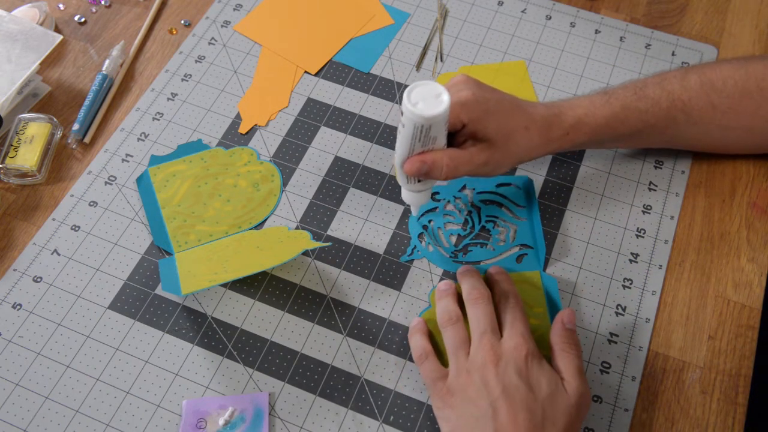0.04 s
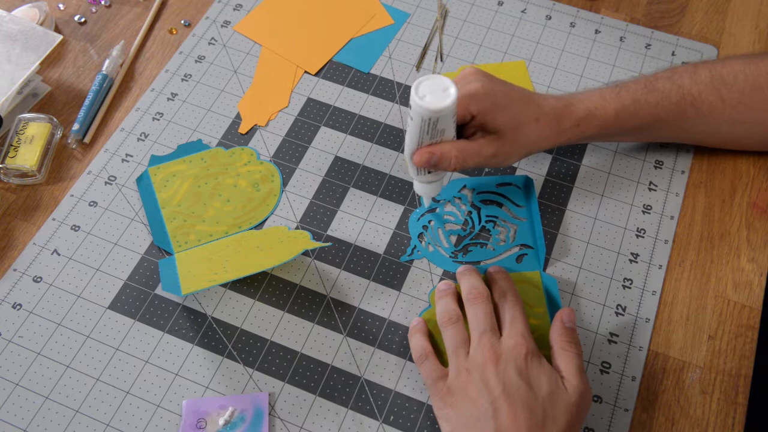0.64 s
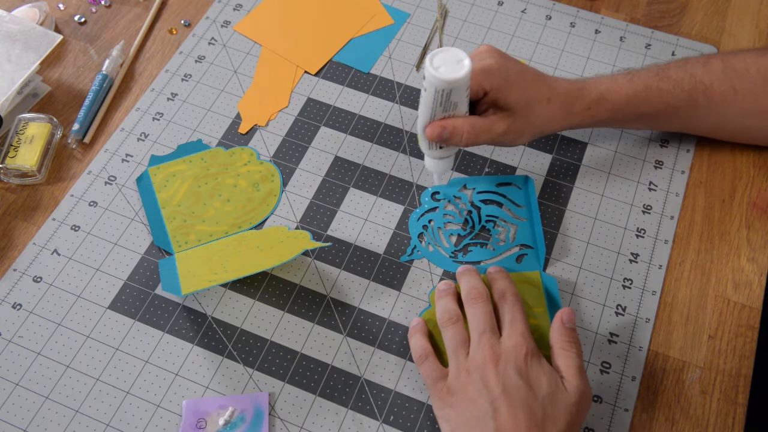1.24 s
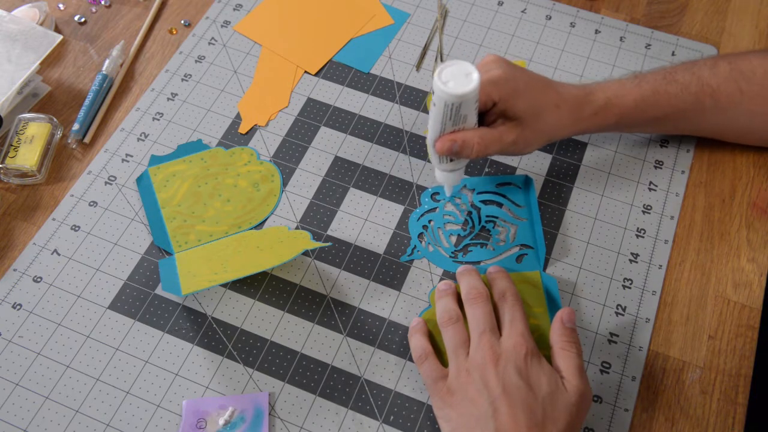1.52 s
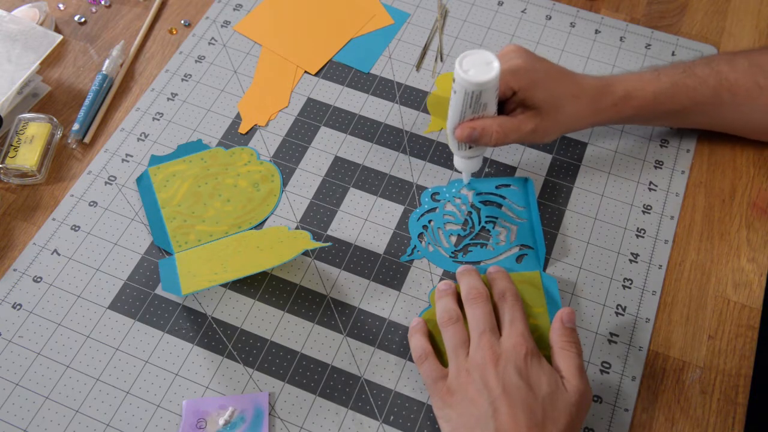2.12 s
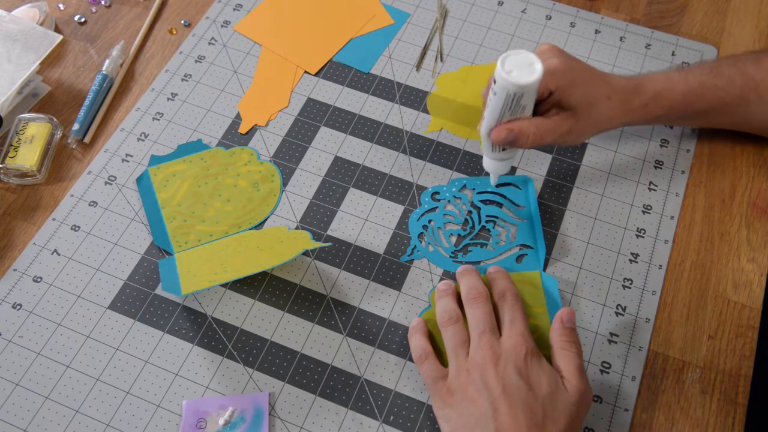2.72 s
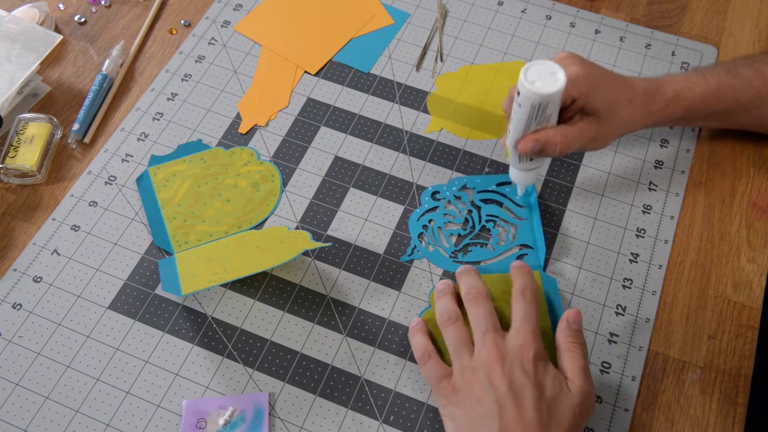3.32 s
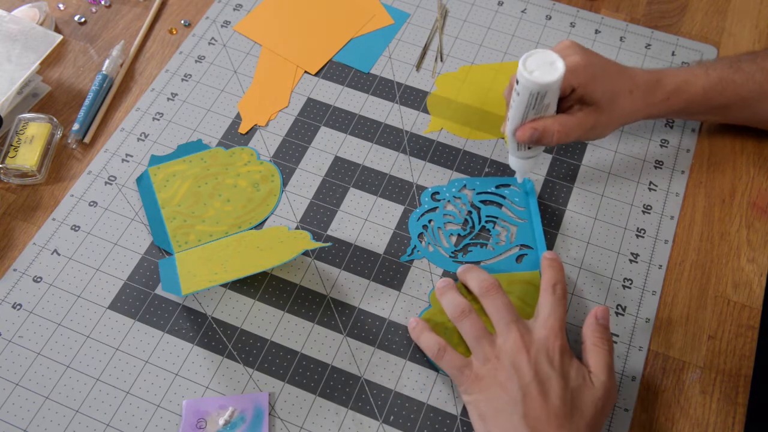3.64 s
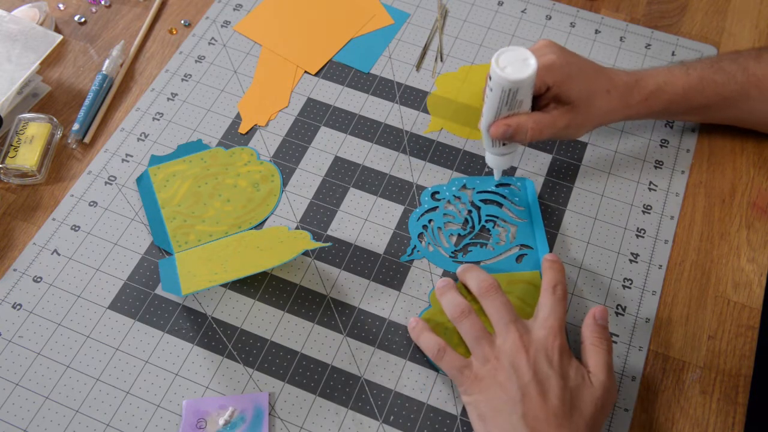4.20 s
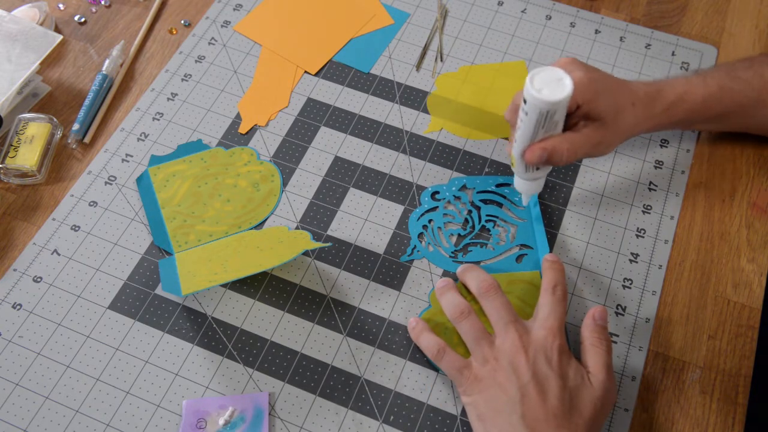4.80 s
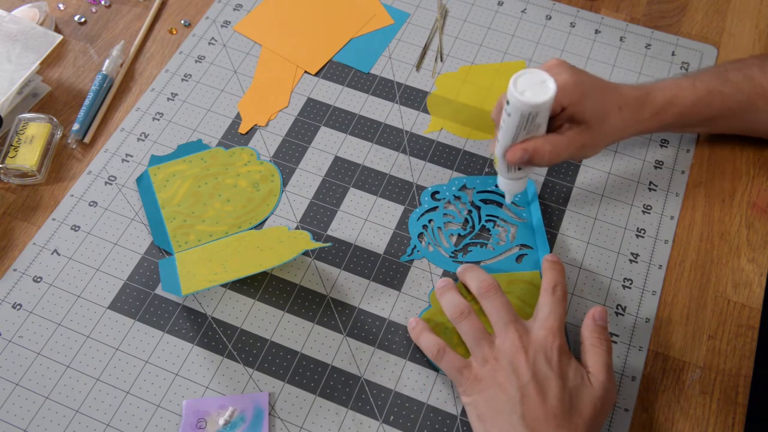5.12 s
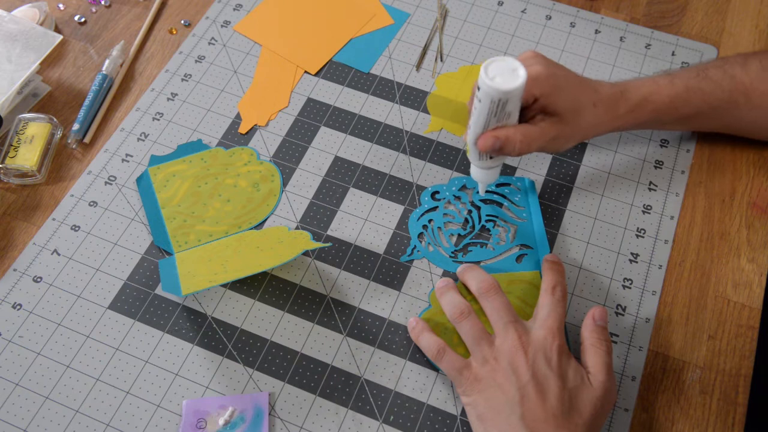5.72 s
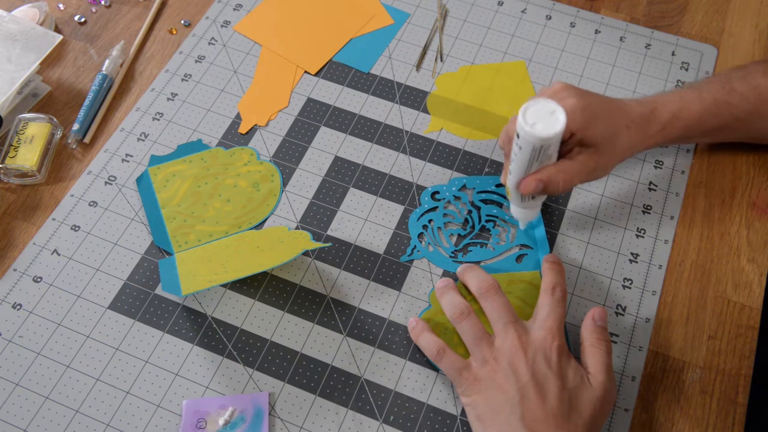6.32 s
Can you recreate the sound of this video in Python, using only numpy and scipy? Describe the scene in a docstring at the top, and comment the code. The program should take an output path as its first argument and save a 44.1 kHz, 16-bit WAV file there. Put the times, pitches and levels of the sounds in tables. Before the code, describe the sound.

A plastic glue bottle dabs dots onto cardstock lying on a mat on a wooden table, heard close up. From about 0.2 seconds the tip lands roughly four times a second. Each landing is a light, hollow thump from the table with a papery tick on top, followed almost at once by a small click as the tip lifts off. Now and then it faintly grazes the card. The dabs grow a little firmer towards 2 seconds, pause after 2.6, and return with two taps just past 3 seconds. Around 3.5 seconds fingers slide over the card with a brief, faint hiss, and at about 3.7 the nozzle gives one sharp little pop. Dabbing resumes immediately, turns softer around 5 seconds, and continues until about 6.4 seconds. The small, quiet room has a faint low hum throughout.

```python
"""Light thumps and ticks, about four a second: a plastic glue bottle dabs dots onto cardstock lying on a
cutting mat on a wooden table. Each impact ticks on the card and excites the low modes of the table top;
some 40 ms later the tip lifts off with a small click. Once the nozzle gives a sharp pop, probably air
breaking through, just after fingers slide over the card. The small quiet room hums faintly."""
import sys
import numpy as np
from scipy import signal
from scipy.fft import rfft, irfft
from scipy.io import wavfile

SR = 44100
rng = np.random.default_rng(int(sys.argv[2]) if len(sys.argv) > 2 else 0)


def put_to_file(sound):
    """Save the sound as 16-bit audio at rate SR, in the file named by the first command-line argument."""
    columns = np.atleast_2d(sound).T  # one column per channel
    safe = np.clip(columns, -1, 1)
    whole_steps = np.round(safe * 32767)
    wavfile.write(sys.argv[1], SR, whole_steps.astype(np.int16))


N = 284577
LEAD_S = .003  # a contact force begins this long before its centre

# Dabs of the bottle: landing_s, strength_db, tick_db, stay_s, lift_click_db
DABS = [(0.1844, -37, -70, .049, -54), (.422, -33, -59.5, 0.042, -50.5), (0.6864, -34.5, -64, 0.038, -58.5),
        (.944, -30, -61.5, 0.04, -50), (1.178, -30.5, -62.5, 0.044, -47.5),
        (1.441, -27.5, -60, 0.061, -50.5), (1.6227, -31, -67, 0.053, -55), (1.8099, -24, -65, 0.039, -57.5),
        (1.984, -28, -57, 0.041, -51), (2.1727, -28, -54, 0.036, -48), (2.381, -29, -53.5, 0.044, -49.5),
        (2.6007, -26.5, -60, 0.052, -53), (3.1179, -31, -76, 0.017, -60), (3.31, -27, -51, 0.039, -61),
        (3.7902, -27.5, -55, 0.039, -59.5), (3.9752, -30.5, -61, 0.037, -54),
        (4.2015, -26, -58, 0.038, -45.5), (4.3981, -27, -52.5, 0.035, -52),
        (4.7132, -33, -60, 0.046, -61.5), (4.997, -38, -75, 0.031, -55), (5.2762, -31.7, -62, .0335, -51.5),
        (5.488, -34.5, -67.5, 0.029, -62.5), (5.696, -29, -60, 0.038, -54),
        (6.016, -29, -62.5, 0.037, -66.5), (6.2269, -28.3, -54.5, 0.031, -59),
        (6.4326, -29.5, -58.5, .0098, -51.5)]


def table_thumps(firm_hz, firm_db, softening):
    """Impact excitation: a gentler dab stays longer in contact, so the same modes sound duller."""
    # Table top and the long low room modes it feeds: pitch_hz, level_db, t60_s, polarity
    table_modes = [ (66.1, -19.5, .45, 1), (112.4, -27.9, .31, -1), (128, -26.4, .31, -1),
                   (147.4, -30.1, .52, -1), (164.6, -1.7, .186, 1), (198, -.8, .05, -1),
                   (229.6, -24.8, .244, 1), (236.7, -23.8, .222, -1), (263.7, -4.6, .063, -1),
                   (278.5, -15.4, .188, -1), (294.1, -19.5, .3, -1), (305.9, 1, .034, 1),
                   (314.6, -33.2, .6, -1), (330.4, -32, .5, 1), (346.4, -8.8, .079, -1),
                   (372.8, -19.8, .3, -1), (424.5, -17, 0.033, -1), (420, -40, 0.19, -1),
                   (564, -49, 0.068, -1), (646, -30.5, 0.045, 1), (845, -49.5, 0.18, 1),
                   (811, -25, 0.074, 1), (940, -24.5, 0.026, -1)]
    thump, out = ring(table_modes, seconds(.5)), np.zeros(N)
    for start_s, db, *_ in DABS:
        contact_hz = np.clip(firm_hz * from_db(softening * (db - firm_db)), 150, 5000)
        lowpass = signal.butter(2, contact_hz, fs=SR)
        add(out, start_s, from_db(db) * signal.lfilter(*lowpass, thump))
    return out


def tip_contacts():
    """Contact transients: the tip ticks on landing, clicks on lifting and at times grazes the card."""
    # The tip catching a cut edge of the card: start_s, level_db
    edge_grazes = [(.0884, -67.5), (0.7595, -62), (1.4313, -60.5), (1.4786, -65), (1.6569, -68),
                   (1.7987, -58.5), (2.1558, -60.5), (3.0973, -62.5), (3.113, -57.5), (3.2892, -62),
                   (3.3887, -66.5), (3.414, -61.5), (3.5859, -66.5), (3.8015, -59.5), (3.9842, -64),
                   (4.1865, -67), (4.378, -61), (4.7185, -62), (5.0068, -57.5), (5.4605, -67),
                   (5.672, -63.5), (5.9953, -63.5)]
    press_s, knock_db = .0005, -27.5  # the bottle knocks as the card is pressed flat
    landings = [(s + press_s, db + knock_db, tick_db) for s, db, tick_db, _, _ in DABS]
    lifts = [(s + stay_s, db, db - 5) for s, _, _, stay_s, db in DABS]
    grazes = [(s, db - 2.5, db) for s, db in edge_grazes]
    return (ticks(landings, crackle_db=-9, low_hz=800, rise_t60=.0094, fall_t60=.043, snaps_per_s=3000)
            + ticks(lifts, crackle_db=-17, low_hz=2500, rise_t60=.006, fall_t60=.04, snaps_per_s=3500)
            + ticks(grazes, crackle_db=-10, low_hz=830, rise_t60=.005, fall_t60=.03, snaps_per_s=3000))


def ticks(events, crackle_db, low_hz, rise_t60, fall_t60, snaps_per_s):
    """Shot noise: paper fibres and tacky glue snap at random around each impulse on the bottle."""
    t, out = seconds(.06) - LEAD_S, np.zeros(N)
    envelope = fade(np.abs(t), np.where(t < 0, rise_t60, fall_t60))
    highpass = signal.butter(1, low_hz, "high", fs=SR)  # tiny snaps carry little bass
    for contact_s, body_db, nozzle_db in events:
        snaps = (rng.random(len(t)) < snaps_per_s / SR) * rng.laplace(size=len(t))
        force = from_db(crackle_db) * signal.lfilter(*highpass, snaps) * envelope
        force[int(LEAD_S * SR)] += 1  # the contact itself
        add(out, contact_s - LEAD_S, bottle(force, body_db, nozzle_db, variety=1))
    return out


def nozzle_pop(pulse_hz):
    """A bipolar pressure pulse, strongest around pulse_hz, rings the bottle."""
    # Push and pull of air at the nozzle: time_s, body_db, nozzle_db
    pops = [(3.6555, -42.5, -33)]
    phase = 2 * np.pi * pulse_hz * (seconds(.05) - LEAD_S)
    force, out = phase * np.exp(-phase ** 2 / 2), np.zeros(N)
    for time_s, body_db, nozzle_db in pops:
        add(out, time_s - LEAD_S, bottle(force, body_db, nozzle_db, variety=0))
    return out


def bottle(force, body_db, nozzle_db, variety):
    """Resonance: one force at the tip drives both the hollow body and the stiff nozzle."""
    # Hollow body: pitch_hz, relative_db, t60_s, polarity
    body_modes = [(824, -7, 0.019, 1), (955, -14.5, 0.0094, -1), (1546, -8.5, 0.0061, -1),
                  (2069, -5.5, 0.0063, -1), (2255, -3.5, 0.006, 1)]
    # Stiff nozzle and card: pitch_hz, relative_db, t60_s, polarity
    nozzle_modes = [(4610, 4.5, 0.0014, 1), (5740, 9, 0.0014, -1), (6786, 4, 0.0023, 1),
                    (9620, 2, 0.001, 1), (11790, -9, 0.0037, -1), (14360, -2.5, 0.0013, -1)]
    body = from_db(body_db) * struck(body_modes, force, variety)
    return body + from_db(nozzle_db) * struck(nozzle_modes, force, variety)


def struck(modes, force, variety):
    """Forced response of modes that vary with the contact point; rms 1 over the 5 ms of contact."""
    modes = np.array(modes, float)
    modes[:, 0] *= 1 + variety * .015 * rng.standard_normal(len(modes))  # detuning
    modes[:, 1] += variety * 2 * rng.standard_normal(len(modes))  # level scatter, dB
    response = ring(modes, np.arange(len(force)) / SR)
    sound = signal.fftconvolve(force, response)[:len(force)]
    contact = sound[int((LEAD_S - .0007) * SR):][:SR // 200]
    return sound / np.sqrt(np.mean(contact ** 2))


def ring(modes, t):
    """Modal superposition: an impulse response is a sum of damped sinusoids."""
    return sum(np.sign(polarity) * from_db(db) * np.sin(2 * np.pi * hz * t) * fade(t, t60)
               for hz, db, t60, polarity in modes)


def finger_slide():
    """Sliding friction: the fingers holding the card hiss briefly over it."""
    # Envelope of the slide: time_s, level_db
    slide = [(3.36, -86), (3.431, -79), (3.53, -75.5), (3.587, -68), (3.64, -96)]
    # Spectrum of skin on paper: frequency_hz, density_db
    friction = [(500, 1), (1500, 4), (2800, -2.5), (5500, 1), (8500, -6), (12000, -2), (16000, -7)]
    time_s, db = np.transpose(slide)
    return np.interp(np.arange(N) / SR, time_s, from_db(db), left=0, right=0) * noise(friction)


def near_echoes(thumps, clicks):
    """Specular reflection: near surfaces return delayed, weaker copies."""
    # Reflections of the thump: delay_s, gain_db
    surfaces = [(.0091, -11.2), (.02805, -14.4)]
    out = np.zeros(N)
    for delay_s, db in surfaces:
        add(out, delay_s, from_db(db) * thumps)
    add(out, .0122, from_db(-22.5) * clicks)
    return out


def reverberation(x, first_s, build_s):
    """A diffuse field builds up after the first reflection and decays band by band."""
    # Reverberant bands of the room: centre_hz, gain_db, t60_s
    bands = [(90, -26, .4), (180, -25, .45), (400, -22, .45), (750, -13, .3), (1500, -13, .3),
             (3000, -15, .3), (6500, -18, .3), (14000, -21, .2)]
    t, response = seconds(.6), 0
    centres = np.array(bands)[:, 0]
    edges = np.r_[40, np.sqrt(centres[1:] * centres[:-1]), 18000]
    onset = np.clip((t - first_s) / build_s, 0, 1)
    for (_, db, t60), low, high in zip(bands, edges, edges[1:]):
        envelope = onset * fade(t, t60)
        scatter = rng.standard_normal(len(t)) * envelope / np.linalg.norm(envelope)
        bandpass = signal.butter(2, [low, high], "band", fs=SR, output="sos")
        response = response + from_db(db) * signal.sosfilt(bandpass, scatter)
    return signal.fftconvolve(x, response)[:N]


def sweeping_echo(x, start_hz, rise_hz_per_s, peak_s):
    """Repetition pitch: reflections between parallel walls arrive ever closer, as a rising ring."""
    t = seconds(.35)
    swell = (t / peak_s * np.exp(1 - t / peak_s)) ** 2
    sweep = swell * np.sin(2 * np.pi * (start_hz + .5 * rise_hz_per_s * t) * t)
    return signal.fftconvolve(x, sweep / np.abs(rfft(sweep)).max())[:N]


def background(waver, wander_rad):
    """Broadband room air lies under a low hum with slight amplitude and phase modulation."""
    # Tones of the hum: pitch_hz, rms_db
    hum_tones = [(76.5, -61), (114, -81)]
    # Spectrum of the room air: frequency_hz, density_db
    air = [(15, -15), (28, 5.5), (46, -2.5), (70, 1), (100, -7), (160, -10.5), (240, -18), (330, -19),
           (500, -23.5), (900, -28.5), (2200, -34.5), (3000, -39), (6200, -39.5), (15500, -44.5)]
    t, hum = np.arange(N) / SR, 0
    for hz, db in hum_tones:
        amplitude = 1 + waver * drift(2.5)
        phase = 2 * np.pi * hz * t + wander_rad * drift(1.5)
        hum = hum + from_db(db) * rms_one(amplitude * np.sin(phase))
    return from_db(-60) * noise(air) + hum


def noise(spectrum):
    """Spectral shaping colours white noise; rms 1."""
    hz = np.fft.rfftfreq(N, 1 / SR) + 1
    points_hz, levels_db = np.transpose(spectrum)
    colour = from_db(np.interp(np.log(hz), np.log(points_hz), levels_db))
    return rms_one(irfft(rfft(rng.standard_normal(N)) * colour, N))


def drift(rate_hz):
    """Low-pass noise wanders slowly; rms 1."""
    hz = np.fft.rfftfreq(N, 1 / SR)
    return rms_one(irfft(rfft(rng.standard_normal(N)) / (1 + (hz / rate_hz) ** 2), N))


def from_db(db):
    return 10 ** (np.asarray(db) / 20)


def rms_one(x):
    return x / np.sqrt(np.mean(x ** 2) + 1e-20)


def seconds(length_s):
    return np.arange(int(length_s * SR)) / SR


def fade(t, t60):
    """Exponential decay: 60 dB in t60 seconds."""
    return np.exp(-np.log(1000) * t / t60)


def add(track, start_s, sound):
    """Superpose a sound on the track."""
    start = max(round(start_s * SR), 0)
    track[start:start + len(sound)] += sound[:max(N - start, 0)]


def scene():
    """Direct sound, reflections and background superpose close to the table."""
    thumps = table_thumps(firm_hz=1210, firm_db=-25, softening=1.37)
    contacts = tip_contacts()
    pop = nozzle_pop(pulse_hz=6840)
    clicks = contacts + pop
    near = thumps + clicks + near_echoes(thumps, clicks)
    diffuse = reverberation(thumps + contacts + from_db(-1.5) * pop, first_s=.0015, build_s=.013)
    rising = from_db(-18.5) * sweeping_echo(thumps, start_hz=245, rise_hz_per_s=755, peak_s=.08)
    quiet = background(waver=.12, wander_rad=.45)
    return (near + diffuse + rising + finger_slide() + quiet)[None]


def record(dry):
    """Band limiting: a steep low-pass cuts the treble above 16 kHz."""
    return signal.sosfilt(signal.ellip(10, .1, 70, 16000, fs=SR, output="sos"), dry)


dry = scene()
out = record(dry)
put_to_file(out)
```